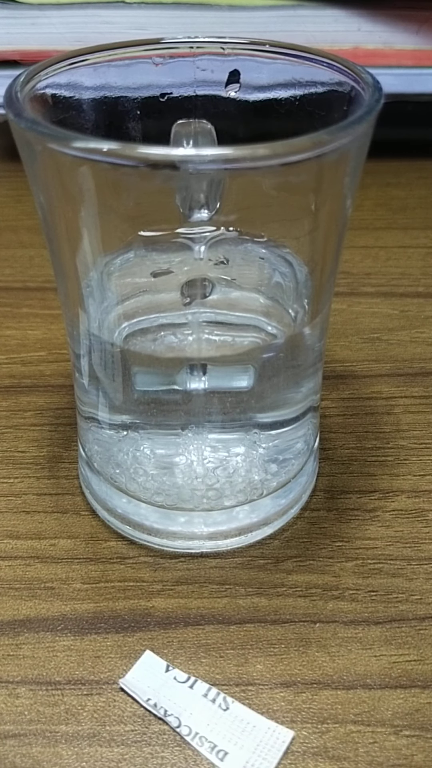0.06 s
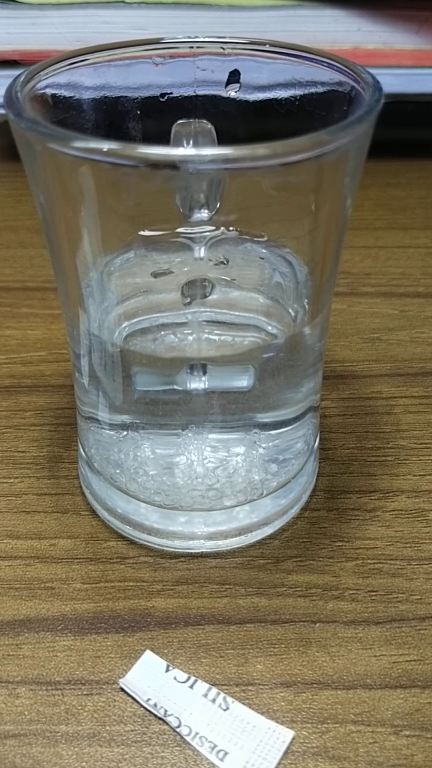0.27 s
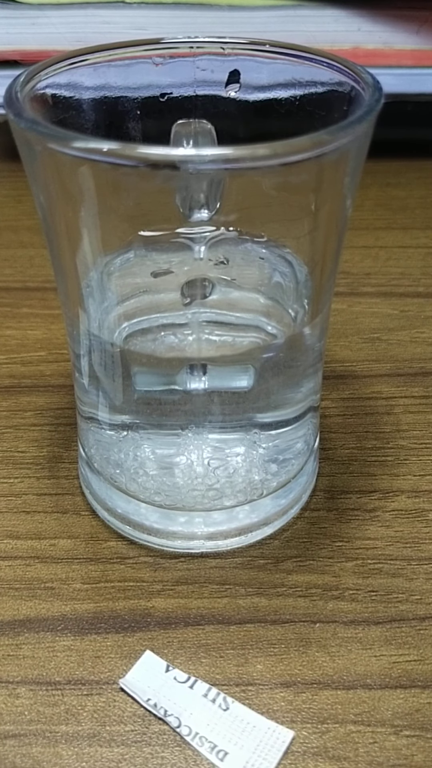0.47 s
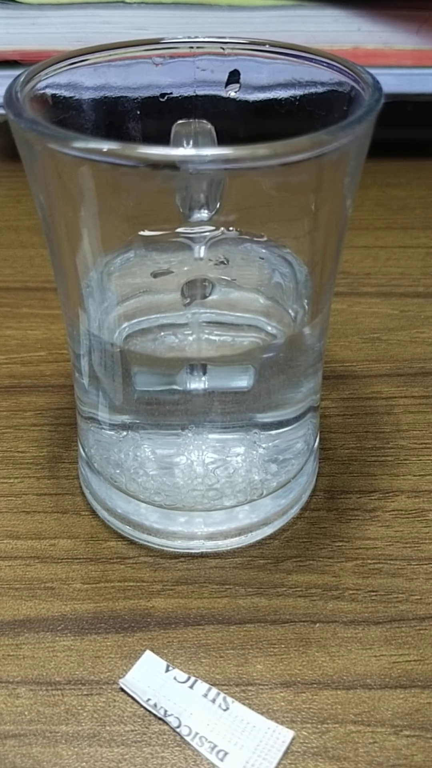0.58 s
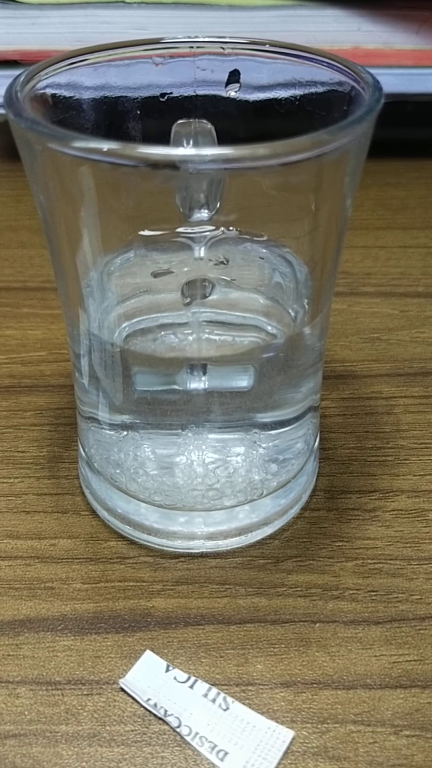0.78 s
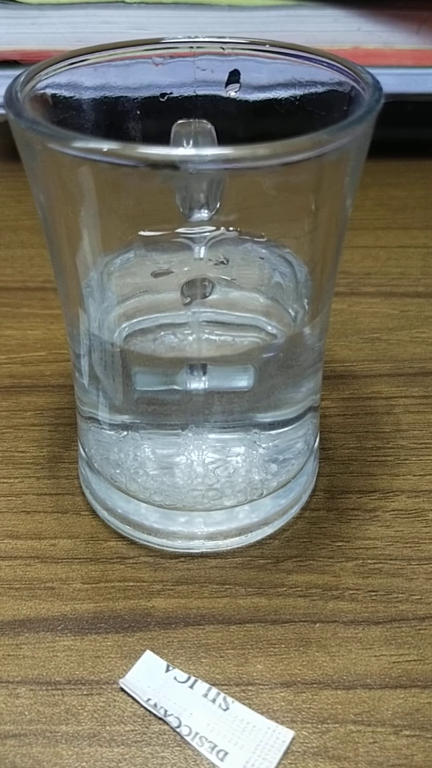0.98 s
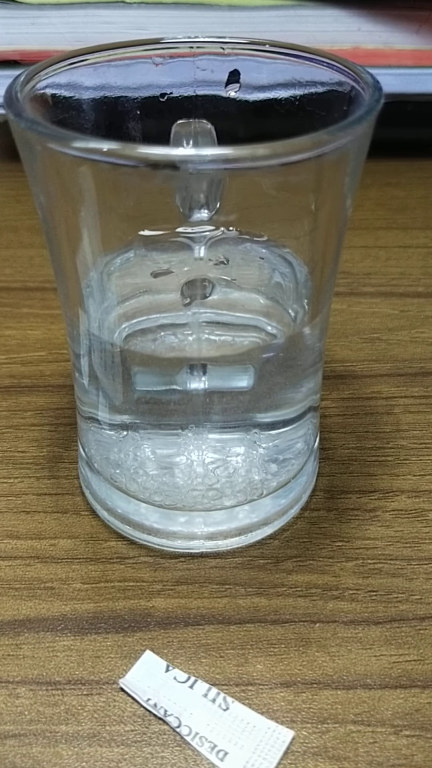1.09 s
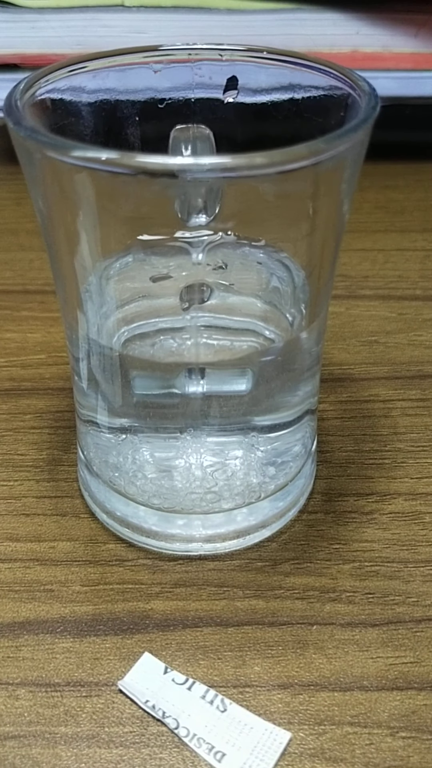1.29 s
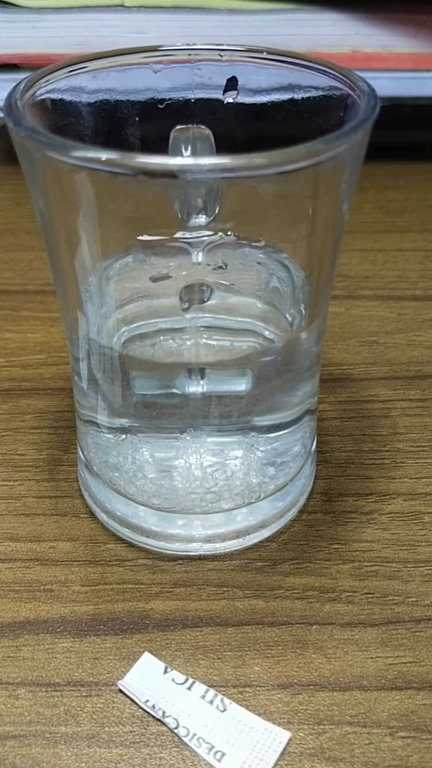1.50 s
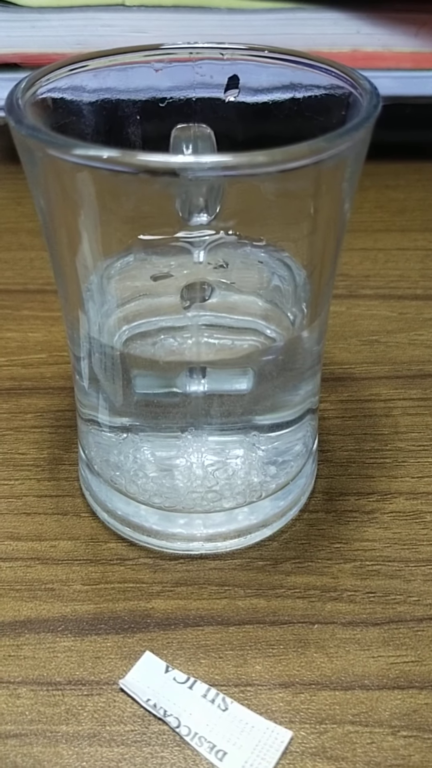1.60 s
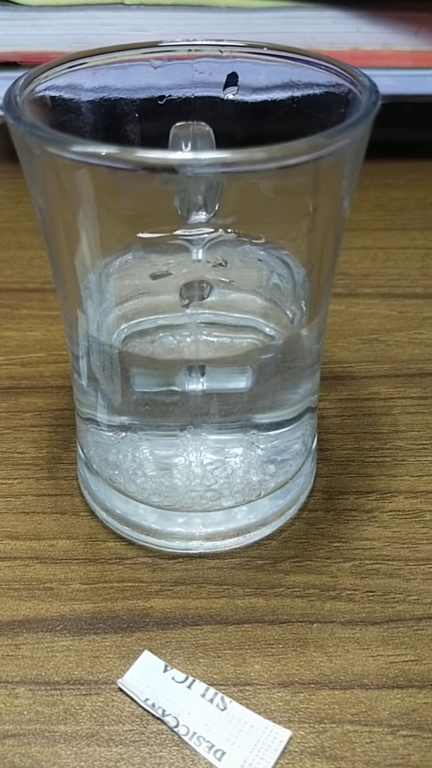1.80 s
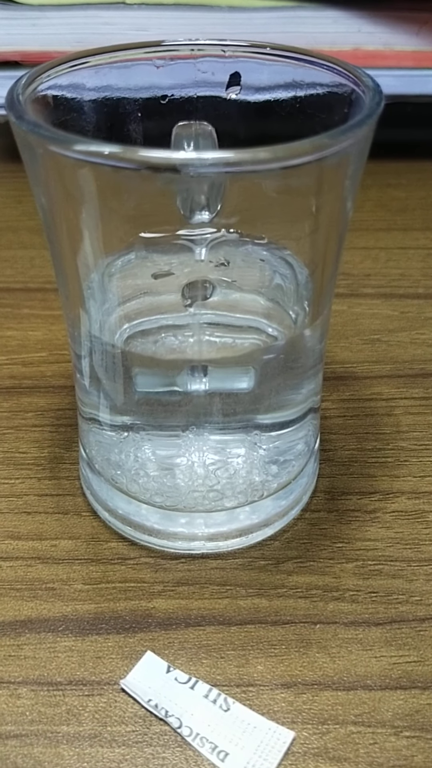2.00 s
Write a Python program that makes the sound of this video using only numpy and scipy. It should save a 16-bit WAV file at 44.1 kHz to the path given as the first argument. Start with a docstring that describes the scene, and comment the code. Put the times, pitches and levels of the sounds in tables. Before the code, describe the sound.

Beads crack in a glass of water with tiny, sharp, high clicks and pings.

```python
"""Silica gel cracking in water

Beads split in a small glass of water on a desk, close by in a quiet room. Each fracture is an impulse:
a tiny snap, a piercing ping near 9 kHz and a faint ringing of the glass in its modes. A fine crackle
leads in and far smaller cracks tick in between; under it all lie a low hum and soft room noise."""
import sys
import numpy as np
from scipy import signal
from scipy.fft import rfft, irfft
from scipy.io import wavfile

SR = 44100
rng = np.random.default_rng(int(sys.argv[2]) if len(sys.argv) > 2 else 0)


def dump_mix(stems):
    """Bounce the given channels to the path in sys.argv[1] as a 16-bit WAV at rate SR."""
    frames = np.atleast_2d(stems).T  # one column per channel
    limited = np.clip(frames, -1, 1)  # hard clip at full scale
    pcm = np.round(limited * 32767).astype(np.int16)
    wavfile.write(sys.argv[1], SR, pcm)


N = 90404
TIME = np.arange(N) / SR

# Partials of the hum. Each row: frequency in Hz, level in dB before any wavering.
HUM_PARTIALS = [(24.14, -44), (113.5, -73.5), (193.8, -81.5), (376.8, -83.5), (580, -90), (772, -91)]
# Spectrum of the room noise. Each row: frequency in Hz, relative level in dB.
AIR_SPECTRUM = [(25, -2.5), (45, 8.5), (70, 4.5), (110, -2.5), (150, -9.5), (300, -7), (500, -15.5),
                (800, -16), (1200, -19.5), (2200, -23.5), (3300, -23.5), (5500, -29.5), (7600, -29.5),
                (8850, -24.5), (10200, -31), (14000, -40), (15300, -37), (16500, -57)]
# Likeness of the room noise in the two channels. Each row: frequency in Hz, correlation.
AIR_CORRELATION = [(50, .8), (250, .74), (600, 0.68), (1200, .25), (3000, .05), (15000, .05)]
# Balance of the room noise. Each row: frequency in Hz, left minus right in dB.
AIR_BALANCE = [(100, 1.5), (500, 0), (6000, 2.5), (8850, -3.5), (12000, -0.5)]
# Two dull taps. Each row: start in seconds, level in dB.
TAP_EVENTS = [(0.2096, -45), (0.2158, -43)]
# Spectrum of a tap. Each row: frequency in Hz, gain in dB.
TAP_SPECTRUM = [(100, -2), (350, 7), (700, 0), (1250, 11), (1900, -7), (4000, -11), (12000, -26)]
# Envelope of the fine crackle. Each row: time in seconds, level in dB.
CRACKLE_ENVELOPE = [(0, -63.5), (.04, -67), (.2, -71.5), (.3, -100)]
# Dry ticks. Each row: start in seconds, level in dB, treble tilt in dB per octave.
TICK_EVENTS = [(.0035, -32, -2.5), (.0142, -42.5, -7), (.066, -56, 9), (.084, -54, 3.5),
               (.4464, -46.5, 2.5), (1.242, -64, 2.5), (1.496, -56, -3), (1.6165, -60, 0),
               (1.838, -57.5, -4.5)]
# Spectrum of ticks and crackle. Each row: frequency in Hz, gain in dB.
TICK_SPECTRUM = [(500, -20), (2000, -11), (3400, -10.5), (5500, -8), (7300, -2), (9200, 7), (11000, -5),
                 (12500, -10.5), (15000, -12.5), (16500, -29.5)]
# Spectra of the shattering bead's thump and hiss. Each row: frequency in Hz, gain in dB.
THUMP_SPECTRUM = [(30, 21), (80, 27), (160, 8.5), (500, -0.5), (1500, -12.5), (5000, -50.5)]
HISS_SPECTRUM = [(1200, -10), (3300, 5), (4000, -3.5), (4900, 3.5), (9500, 6), (11000, -1.5), (14500, -2),
                 (16500, -24.5)]
# Modes of the ping, a piercing, fast-dying ring near 9 kHz.
# Each row: frequency in Hz, level in dB, T60 in seconds.
PING_MODES = [(8865, 3, 0.018), (9170, -3, .008), (9100, -29, .09)]
# Modes of the glass. Each row: frequency in Hz, level in dB, T60 in seconds, left minus right in dB.
GLASS_MODES = [(3320, -53, .05, 0), (3428, -56.5, .38, 1), (3455, -59, .13, 0), (3604, -56, .14, 3),
               (4790, -47, .022, -3), (7190, -45, .07, -1), (8050, -48, .05, -2), (8228, -37.5, .11, -1),
               (11883, -46.5, .04, -8), (12230, -50, .02, -1), (12527, -44.5, .04, 1),
               (15060, -51, .055, 10)]
# Spectrum of a snap. Each row: frequency in Hz, gain in dB.
SNAP_SPECTRUM = [(100, -33.5), (600, -15.5), (1400, -25), (2500, -19.5), (3350, -5), (4100, -10),
                 (4850, -5), (5700, -10), (7500, 7), (9600, 0.5), (10800, -7.5), (12200, 13.5), (13800, 0),
                 (15200, -1.5), (16500, -13)]
# Four frequencies in Hz at which a crack's excitation of the glass is given.
EXCITATION_HZ = [3500, 8000, 12200, 15000]
# Bead fractures. Each row: start in seconds, ping gain in dB, ping left minus right in dB, snap gain
# in dB, snap tilt in dB per octave, snap cutoff in Hz, then a gain in dB at each of EXCITATION_HZ.
FRACTURES = [(.1056, -9, -15, 3, -6, 13100, -2, -12, 7.5, -30),
             (.2400, -25.5, -18, -8, -14, 16000, -2, 3.5, 5.5, 1.5),
             (.2544, -14.5, -18, -0.5, -9, 12500, -7.5, -23, 8, -32),
             (0.502, -23.5, -13, -28, -10, 15900, -13, -10, 6, -1),
             (0.5261, -25, -19, -9, -6.5, 15500, 1, -21, 6, -1),
             (0.8412, -32.5, -24.5, -9.5, -1.5, 15700, -12.5, -20, 2, -13.5),
             (0.9823, -28, -15.5, -2, 0, 16110, -7, -6, 0, 1.5),
             (1.4011, -39, -9, -24.5, -0.5, 15000, -31.5, -29, -24.5, -25.5),
             (1.7362, -30.5, -10.5, 3, -4, 15520, 5.5, -4, -1, 4)]


def from_db(db):
    """Amplitude grows tenfold for every 20 dB."""
    return 10 ** (np.asarray(db) / 20)


def at_hz(points, hz):
    """A spectrum is interpolated on a logarithmic frequency axis."""
    freq, value = np.transpose(points)
    return np.interp(np.log(np.maximum(hz, 1)), np.log(freq), value)


def pan(db):
    """A level difference, left minus right, sets the apparent direction."""
    return from_db(np.array([[.5], [-.5]]) * db)


def add(out, start_s, sound):
    """Superposition: a stereo sound adds to the mix from its start time on."""
    start = int(round(start_s * SR))
    part = sound[:, :max(N - start, 0)]
    out[:, start:start + part.shape[1]] += part


def coloured(source, spectrum, tilt_db=0, top_hz=20000):
    """A minimum-phase filter shapes the spectrum causally, so attacks stay sharp."""
    hz = np.abs(np.fft.fftfreq(source.shape[1], 1 / SR))
    octaves = np.log2(np.maximum(hz, 4000) / 8000)  # the tilt pivots at 8 kHz
    gain = from_db(at_hz(spectrum, hz) + tilt_db * octaves)
    gain /= np.sqrt(1 + (hz / top_hz) ** 24)  # 12th-order low-pass
    response = np.exp(np.conj(signal.hilbert(np.log(gain))))
    return np.fft.ifft(np.fft.fft(source) * response).real


def burst(decay_s, size=8192):
    """A broadband transient is noise with a sudden onset and exponential decay."""
    return rng.choice([-1, 1], (2, size)) * np.exp(-TIME[:size] / decay_s)


def damped_mode(hz, t60, phase_cycles, rise_s=.00045):
    """A damped oscillator builds up over a few cycles, then loses 60 dB every t60 seconds."""
    t = TIME[:SR // 2]
    envelope = (1 - np.exp(-t / rise_s)) * from_db(-60 * t / t60)
    return envelope * np.sin(2 * np.pi * (hz * t + phase_cycles))


def reflections(sound, t60, delay_s):
    """Reverberation is convolution with dense, decaying echoes, different in each channel."""
    t = TIME[:SR // 2]
    echoes = rng.standard_normal((2, len(t))) * from_db(-60 * t / t60) * (t > delay_s)
    echoes /= np.sqrt(np.sum(echoes ** 2, axis=1, keepdims=True))
    return signal.fftconvolve(sound, echoes, axes=1)[:, :N]


def room_noise():
    """Partial coherence: shared and opposed noise mix so that the channels are alike in the bass."""
    hz = np.fft.rfftfreq(N, 1 / SR)
    mid, side = rfft(rng.standard_normal((2, N)))
    correlation = at_hz(AIR_CORRELATION, hz)
    stereo = np.sqrt(1 + correlation) * mid + np.sqrt(1 - correlation) * side * [[1], [-1]]
    air = irfft(stereo * from_db(at_hz(AIR_SPECTRUM, hz)) * pan(at_hz(AIR_BALANCE, hz)), N)
    return from_db(-61.5) * air / air.std()


def waver(bandwidth_hz=6):
    """Narrow-band noise about 1 slowly modulates amplitude and phase."""
    hz = np.fft.fftfreq(N, 1 / SR)
    slow = np.fft.ifft(np.exp(-(hz / bandwidth_hz) ** 2 / 2 + 2j * np.pi * rng.random(N)))
    return 1 + slow / slow.std()


def hum():
    """A line spectrum: the deepest partial is steady and the upper ones waver."""
    deep, *upper = [from_db(db) * np.sqrt(2) * np.exp(2j * np.pi * (hz * TIME + rng.random()))
                    for hz, db in HUM_PARTIALS]
    return np.real(deep + sum(partial * waver() for partial in upper))


def taps():
    """Two faint, heavily damped transients sound dull for lack of treble."""
    out = np.zeros((2, N))
    for start_s, db in TAP_EVENTS:
        add(out, start_s, from_db(db) * coloured(burst(decay_s=.002), TAP_SPECTRUM))
    return out


def ping(left_lag_s=.00003):
    """Free vibration near 9 kHz dies in hundredths of a second, but for one faint, less damped mode."""
    lag_s = np.array([[left_lag_s], [0]])
    return sum(from_db(db) * damped_mode(hz, t60, -hz * lag_s) for hz, db, t60 in PING_MODES)


def fizz(per_second=40):
    """The smallest cracks form a Poisson process, each exciting a barely audible ping."""
    onsets = rng.random((1, N)) < per_second / SR
    impulses = onsets * from_db(-70 + 3 * rng.standard_normal(N))
    return pan(db=-6) * signal.fftconvolve(impulses, ping(), axes=1)[:, :N]


def crackle(per_second=700, spread_db=5):
    """Impulses too weak to ring the glass make a fine opening crackle and scattered dry ticks."""
    sizes = from_db(spread_db * rng.standard_normal((2, N))) * rng.choice([-1, 1], (2, N))
    onsets = rng.random(N) < per_second / SR
    grains = coloured(sizes * onsets, TICK_SPECTRUM)
    envelope = from_db(np.interp(TIME, *np.transpose(CRACKLE_ENVELOPE)))
    out = envelope * grains / grains.std()
    for start_s, db, tilt_db in TICK_EVENTS:
        add(out, start_s, from_db(db) * coloured(burst(decay_s=.002), TICK_SPECTRUM, tilt_db))
    return pan(db=-4) * out


def shatter(start_s=.1056):
    """Fragmentation: the strongest crack has a low thump under it and a hiss of splinters after it."""
    out = np.zeros((2, N))
    add(out, start_s, from_db(-43) * coloured(burst(decay_s=.015), THUMP_SPECTRUM))
    add(out, start_s, from_db(-51) * coloured(burst(decay_s=.04), HISS_SPECTRUM))
    return out


def cracks():
    """Impulse excitation: each bead splits with a snap and a ping and sets the glass's modes ringing."""
    out = np.zeros((2, N))
    for start_s, ping_db, pan_db, snap_db, tilt_db, top_hz, *excitation_db in FRACTURES:
        add(out, start_s, from_db(ping_db) * pan(pan_db) * ping())
        snap = coloured(burst(decay_s=.0019), SNAP_SPECTRUM, tilt_db, top_hz)
        add(out, start_s, from_db(snap_db - 28.5) * snap)
        for hz, db, t60, side_db in GLASS_MODES:
            mode_db = db + np.interp(hz, EXCITATION_HZ, excitation_db) + 1.5 * rng.standard_normal()
            phase_cycles = .17 * rng.standard_normal((2, 1))
            add(out, start_s, from_db(mode_db) * pan(side_db) * damped_mode(hz, t60, phase_cycles))
    return out


def scene():
    """Direct sound, early desk reflections and room reverberation superpose on the background."""
    direct = cracks() + fizz() + crackle() + taps() + shatter()
    spread = direct + .4 * direct[::-1]  # each side also feeds the other's echoes
    desk = from_db(-15) * reflections(spread, t60=.033, delay_s=.002)
    room = from_db(-19) * reflections(spread, t60=.25, delay_s=.0069)
    return direct + desk + room + room_noise() + hum()


def record(dry):
    """An elliptic low-pass filter cuts the treble steeply above 16.5 kHz."""
    return signal.sosfilt(signal.ellip(10, .1, 70, 16500, fs=SR, output="sos"), dry)


dry = scene()
out = record(dry)
dump_mix(out)
```